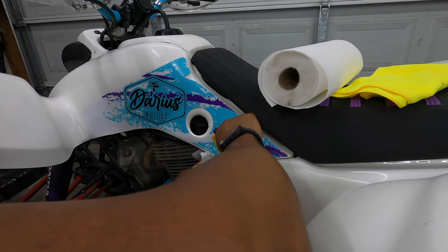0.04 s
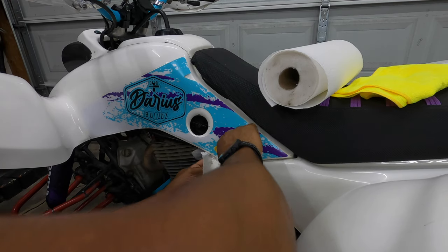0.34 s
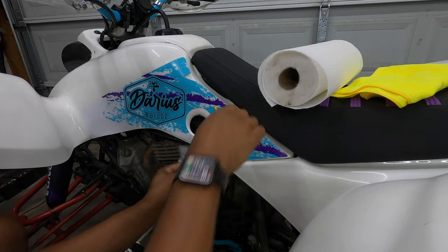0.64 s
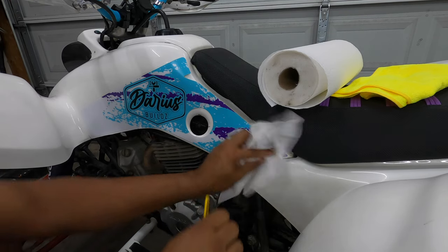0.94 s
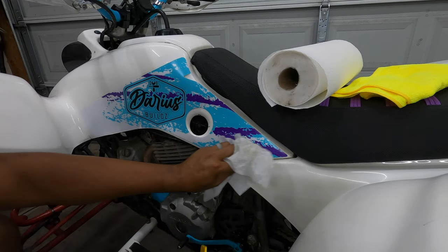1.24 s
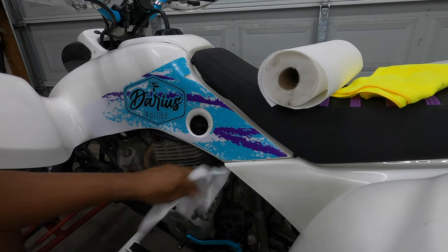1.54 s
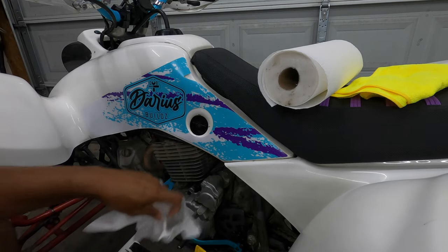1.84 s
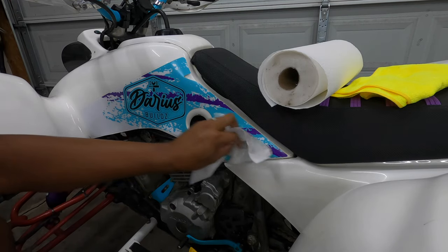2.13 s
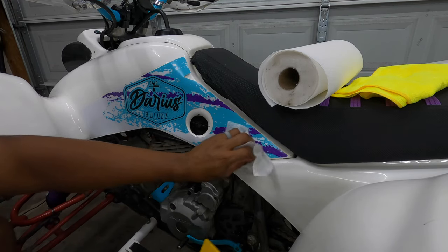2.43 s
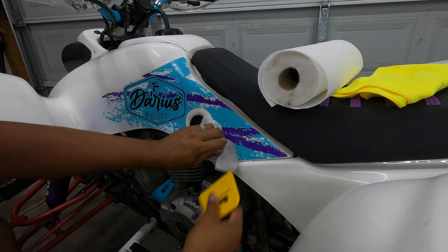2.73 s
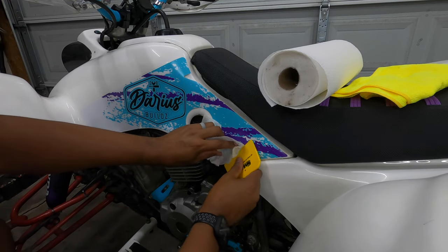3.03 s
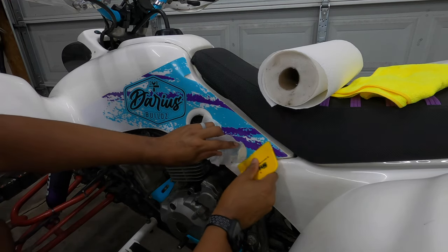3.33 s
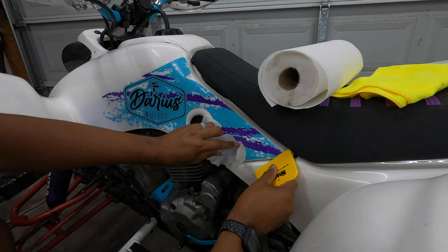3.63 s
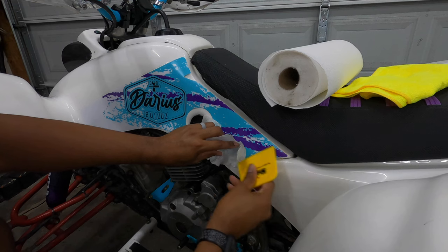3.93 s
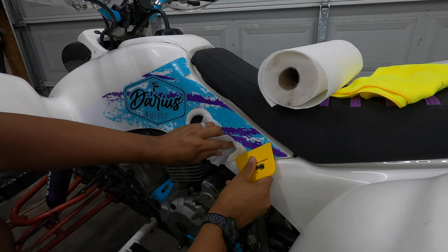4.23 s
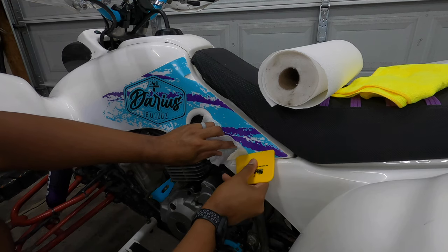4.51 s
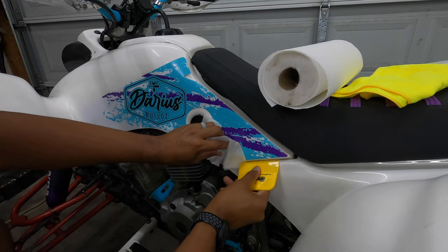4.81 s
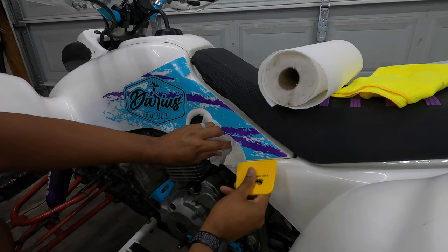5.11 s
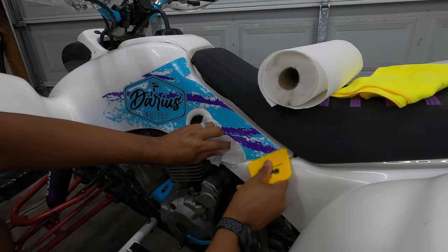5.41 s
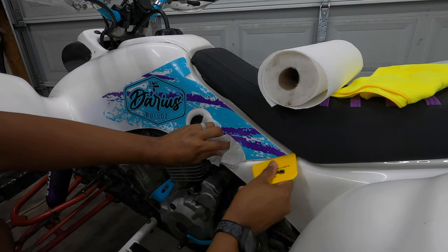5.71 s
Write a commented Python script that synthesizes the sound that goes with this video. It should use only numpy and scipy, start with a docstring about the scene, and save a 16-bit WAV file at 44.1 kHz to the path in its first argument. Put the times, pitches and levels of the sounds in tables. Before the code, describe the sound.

In a garage, fingers knock a hollow plastic panel, a paper towel wipes softly, and a plastic card scrapes and snaps over wet vinyl.

```python
"""Hollow plastic knocks, sharp snaps and soft, damp rubbing: hands work a wet vinyl decal onto a quad bike.
Fingers knock the side panel and ring its modes. A plastic squeegee card snaps over the edge,
and scrapes and sings hoarsely on the wet vinyl. A paper towel wipes with a faint crinkle.
The garage rings briefly and rumbles; one microphone hears it all and overloads on the hardest blows."""
import sys
import numpy as np
from scipy import signal
from scipy.fft import rfft, irfft
from scipy.io import wavfile
from scipy.ndimage import uniform_filter1d, minimum_filter1d

SR = 44100
rng = np.random.default_rng(int(sys.argv[2]) if len(sys.argv) > 2 else 0)


def output_pcm(signal):
    """Save a mono or channel-first signal as 16-bit PCM at the path in sys.argv[1].

    Samples are clipped to [-1, 1] before scaling.
    """
    pcm = np.clip(np.atleast_2d(signal).T, -1, 1) * 32767
    wavfile.write(sys.argv[1], SR, np.round(pcm).astype(np.int16))


N = 258293
TIME = np.arange(N) / SR
RING_TIME = TIME[:SR // 2]

# Finger blows on the panel. Each row: start in seconds, peak in dB, pitch the spot favours in Hz,
# contact cutoff in Hz (low is soft), rebound in dB against the blow.
FINGER_KNOCKS = [(0.4115, -4.5, 730, 1180, -6.5), (0.462, -3.5, 694, 930, -14), (0.474, -8, 167, 300, -12),
                 (0.537, -19.5, 664, 1210, -8), (0.583, 1, 335, 860, -15), (1.0891, 1, 487, 880, -10.5),
                 (1.128, -15.5, 286, 496, -4.5), (1.165, -20, 616, 1220, -13), (1.595, -14, 470, 610, -2),
                 (1.618, 6.5, 350, 920, -5), (2.362, -14, 470, 736, -22), (3.0775, -8, 422, 1300, -12),
                 (3.903, -10, 281, 470, -4), (4.232, -18.5, 182, 900, -16), (4.921, -12, 242, 493, 0.5),
                 (5.084, -15, 402, 450, -12), (5.112, -18, 295, 403, -2), (5.431, -13.5, 174.5, 1200, -7),
                 (5.7232, 7.5, 300, 2600, -2.5), (5.823, -6.5, 223, 450, -10)]
# The hollow panel's modes. Each row: pitch in Hz, level in dB, time to fade 60 dB in seconds.
PANEL_MODES = [(58, -69, 0.13), (137.5, -2, 0.12), (157, -15, 0.23), (205, 0.5, 0.19), (257.8, -8, 0.24),
               (318, 1.5, 0.14), (357.4, -6, 0.2), (393.8, 1, 0.11), (424.5, 1.5, 0.065), (512, -9.5, 0.15),
               (611, 1.5, 0.035), (701.4, 0, 0.037), (905, -5.5, 0.073), (1045, -11, 0.055),
               (1346, 10.5, 0.012), (1592, 1.5, 0.011), (1970, -36, .03)]
# The card's edge catching and letting go. Each row: start in seconds, ring peak in dB, ring pitch in Hz,
# crack level in dB, lead of the skid in seconds, room send in dB.
CARD_SNAPS = [(0.41, -15, 2520, -38, .001, -14), (0.459, -14, 2390, -17, 0.0041, -8),
              (0.536, -22, 2330, -22, .001, 6), (0.577, -19.5, 2870, -18.5, .002, -9),
              (0.914, -38, 4070, -27, 0.0028, -4), (1.0899, -24, 2240, -32, 0.0011, 7.5),
              (1.618, -19.5, 2930, -17.5, 0.01, -6), (3.0741, -11, 2365, -16, 0.00094, -7),
              (4.232, -11, 2274, -35, 0.00102, -5), (4.915, 4, 2545, 4, .0055, -1.5),
              (5.43, -20, 2610, -6, 0.00053, -2.5), (5.7206, 11.5, 2123, 12.5, .002, -6.5)]
# The card's modes. Each row: multiple of the ring pitch, level in dB, time to fade 60 dB in seconds.
CARD_MODES = [(.62, -12, .008), (1, 0, .011), (1.25, -9, .007), (1.95, -12, .01), (2.3, -15, .007)]
# Squeegee strokes. Each row: moment of hardest push in seconds, length in seconds, scrape level in dB,
# singing level in dB, singing pitch in Hz (higher when bent further).
SQUEEGEE_STROKES = [(0.76, 0.42, -44, -86, 2300), (3.037, 0.15, -35, -51, 2050),
                    (3.406, 0.16, -42.5, -45, 2170), (3.542, 0.33, -45, -46, 2330),
                    (3.957, 0.079, -37.5, -53, 2130), (4.259, 0.22, -39.5, -53, 2200),
                    (4.54, 0.12, -49, -59, 2340), (4.957, 0.16, -30.5, -35, 3220),
                    (5.096, 0.23, -35, -52.5, 3040), (5.377, 0.22, -39, -49, 2120),
                    (5.535, 0.2, -40, -48, 2220)]
# Resonances of the card bowed by wet vinyl. Each row: multiple of its pitch, width in Hz, level in dB,
# change in dB when fully bent.
SINGING_BANDS = [(1, 434, -5.5, 13), (1.998, 585, 0, -24), (2.8, 800, -8, -30)]
# Towel wipes. Each row: moment of hardest push in seconds, length in seconds, level in dB.
TOWEL_WIPES = [(0.494, 0.92, -52), (1.097, 0.3, -45.5), (1.296, 0.33, -45), (1.48, 0.11, -53),
               (1.596, 0.44, -45), (1.921, 0.11, -46), (2.16, 0.1, -45.5), (2.354, 0.39, -46.5),
               (2.652, 0.45, -49.5)]
# Tone curves for the card's crack and scrape, the paper, the walls' echo and the room's air.
# Each row: frequency in Hz, relative level in dB.
CRACK_TONE = [(300, 7), (900, -3), (1600, 2.5), (3000, 3), (4100, -8.5), (5200, -1), (7000, -4.5),
              (10000, -9.5), (16000, -19)]
SCRAPE_TONE = [(400, -5), (1300, -5.5), (2200, 4), (3400, -2), (4800, -8), (7000, -12.5), (10000, -17),
               (16000, -29)]
PAPER_TONE = [(300, -41), (1000, 3), (2200, 5.5), (4000, 1), (7000, -0.5), (11000, -4.5), (16000, -9)]
WALL_TONE = [(50, 19), (150, -5), (300, -2), (700, 3.5), (1400, 0.5), (2800, -4.5), (5000, -5), (9000, -6),
             (16000, 1)]
AIR_TONE = [(59, -37), (100, -4), (129, -7.5), (255, -27.5), (335, -17.5), (524, -20.5), (621, -18.5),
            (1150, -28.5), (1610, -33), (2370, -32), (2860, -38), (3190, -36.5), (5650, -38.5),
            (15000, -40.5), (16000, -44)]
# The garage's decay. Each row: frequency in Hz, time to fade 60 dB in seconds.
GARAGE_DECAY = [(125, 0.46), (350, 0.57), (1000, 0.49), (2800, 0.43), (7000, 0.47), (15000, 0.33)]
# The garage's low rumble. Each row: centre in Hz, width in Hz, relative level in dB.
RUMBLE_BANDS = [(26.6, 23.4, 7.5), (55, 11.7, -11), (100, 110, -11)]
# The swell of a low drone. Each row: time in seconds, relative level in dB.
DRONE_SWELL = [(0, -40), (1.5, -31.5), (3.8, -26.5), (5.86, -29.5)]


def panel_knocks(graze_lead_s=0.007, rebound_lag_s=0.011, room_db=-4):
    """Every knock is a bright fingertip graze, the blow, and the panel springing back lower and duller."""
    out = np.zeros((2, N))
    # the resting hand shifts the modes a little from blow to blow
    grips = 1 + .02 * rng.standard_normal((len(FINGER_KNOCKS), len(PANEL_MODES)))
    for (s, db, spot_hz, contact_hz, rebound_db), detune in zip(FINGER_KNOCKS, grips):
        graze = panel_blow(spot_hz, contact_hz * 4.6, detune)
        rebound = panel_blow(spot_hz * 0.677, contact_hz * 0.44, detune)
        blow = panel_blow(spot_hz, contact_hz, detune)
        add(out, s - graze_lead_s, peak(graze, db - 19), room_db)
        add(out, s, peak(blow, db), room_db)
        add(out, s + rebound_lag_s, peak(rebound, db + rebound_db), room_db)
    return out


def panel_blow(spot_hz, contact_hz, detune, spot_db=7, spot_octaves=0.69, dent_cycles=16.8,
               press_s=0.00098, clack_s=0.028):
    """A blow dents the panel and rings its modes, most of all those that move at the struck spot."""
    ring = 0
    for (hz, db, t60), shift in zip(PANEL_MODES, detune):
        nearness = np.exp(-(np.log2(hz / spot_hz) / spot_octaves) ** 2)
        ring = ring + mode(hz * shift, db + spot_db * nearness, t60)
    # the crowded upper modes blur into a short clack
    clack = undb(5) * rng.standard_normal(len(RING_TIME)) * np.exp(-RING_TIME / clack_s)
    dent = mode(spot_hz, db=10, t60=dent_cycles / spot_hz)
    attack = 1 - np.exp(-RING_TIME / press_s)
    # a soft fingertip pushes for longer and leaves the high modes still
    return lowpass((ring + clack + dent) * attack, contact_hz)


def card_snaps(skid_db=-7.5, bounce_s=0.0047):
    """The card's edge skids, snaps free and lands once more."""
    out = np.zeros((2, N))
    for s, ring_db, ring_hz, crack_db, skid_s, room_db in CARD_SNAPS:
        add(out, s - skid_s, card_click(ring_db + skid_db, ring_hz, crack_db + skid_db), room_db)
        add(out, s, card_click(ring_db, ring_hz, crack_db), room_db)
        add(out, s + bounce_s, card_click(ring_db - 23, ring_hz, crack_db - 14), room_db)
    return out


def card_click(ring_db, ring_hz, crack_db, attack_s=0.0015, crack_s=0.0042, db_per_octave=14):
    """The card lets go with a crack and rings at a pitch set by the grip."""
    ring = sum(mode(ring_hz * ratio, db, t60) for ratio, db, t60 in CARD_MODES)
    ring *= 1 - np.exp(-RING_TIME / attack_s)
    crack = unit(colour(rng.standard_normal(len(RING_TIME)), CRACK_TONE)) * np.exp(-RING_TIME / crack_s)
    # a harder snap is quicker and so brighter, up to the limit of the soft plastic
    edge_hz = min(14000 * 2 ** (crack_db / db_per_octave), 10200)
    return peak(lowpass(ring, edge_hz), ring_db) + undb(crack_db) * lowpass(crack, edge_hz) / 2


def squeegee(uneven_db=1.85, flat_hz=2100, bent_hz=2380):
    """The card's edge scrapes unevenly over wet vinyl and sets the card singing hoarsely."""
    scrape_gain = sum(undb(db) * pressure(s, length) for s, length, db, _, _ in SQUEEGEE_STROKES)
    song_gain = sum(undb(db) * pressure(s, length) for s, length, _, db, _ in SQUEEGEE_STROKES)
    friction = slips() * undb(uneven_db * wander(rate_hz=110))
    times, *_, pitches = np.transpose(SQUEEGEE_STROKES)
    pitch = np.interp(TIME, times, pitches)
    bend = np.interp(pitch, [flat_hz, bent_hz], [0, 1])
    phase = 2 * np.pi * np.cumsum(pitch) / SR
    song = 0
    for multiple, width_hz, db, bent_db in SINGING_BANDS:
        # each resonance picks a narrow band from the slips; bending chokes the upper ones
        carrier = np.exp(1j * multiple * phase)
        band = (lowpass(friction / carrier, width_hz / 2) * carrier).real
        song = song + undb(db + bend * bent_db) * band
    return scrape_gain * unit(colour(friction, SCRAPE_TONE)) + song_gain * unit(song)


def paper_towel(crinkle_db=-4, crinkle_hz=2300, crinkle_width_hz=2600):
    """Damp paper fibres drag under the hand, and small folds buckle now and then."""
    push = sum(undb(db) * pressure(s, length) for s, length, db in TOWEL_WIPES)
    drag = unit(colour(slips(), PAPER_TONE)) * undb(1.6 * wander(rate_hz=60))
    folds = rng.standard_normal(N) * undb(5.5 * wander(rate_hz=180))
    crinkle = unit(resonate(folds, [(crinkle_hz, crinkle_width_hz, 0)]))
    return push * (drag + undb(crinkle_db) * crinkle)


def pressure(hardest_s, length_s, rise_share=0.44):
    """A hand presses in and eases off."""
    ramp = np.interp((TIME - hardest_s) / length_s, [-rise_share, 0, 1 - rise_share], [0, 1, 0])
    return np.sin(np.pi / 2 * ramp)


def slips(per_second=8000, spread_db=3):
    """Friction: dense tiny slips of unequal size."""
    grains = (rng.random(N) < per_second / SR) * rng.standard_normal(N)
    return unit(grains * undb(spread_db * rng.standard_normal(N)))


def garage_reverb(send, wet_db=-7, predelay_s=0.0014, build_s=0.0032):
    """Close walls return a dense tail whose treble dies first."""
    hz, _, spectrogram = signal.stft(colour(rng.standard_normal(SR), WALL_TONE), SR, nperseg=256)
    age_s = np.linspace(0, 1, spectrogram.shape[1])
    fade = undb(-60 * age_s / curve_at(GARAGE_DECAY, hz)[:, None])
    build = 1 - np.exp(-np.maximum(TIME[:SR] - predelay_s, 0) / build_s)
    tail = signal.istft(spectrogram * fade, SR)[1][:SR] * build
    return undb(wet_db) * signal.fftconvolve(send, unit(tail) / np.sqrt(SR))[:N]


def room_tone(rumble_db=-27.5, drone_hz=68.7, drone_width_hz=21.4, air_db=-36.5):
    """A bed of low rumble, a wavering drone and an even hiss."""
    rumble = unit(resonate(rng.standard_normal(N), RUMBLE_BANDS))
    drone = unit(resonate(rng.standard_normal(N), [(drone_hz, drone_width_hz, 0)]))
    drone_db = np.interp(TIME, *np.transpose(DRONE_SWELL)) + 0.5
    air = unit(colour(rng.standard_normal(N), AIR_TONE))
    return undb(rumble_db) * rumble + undb(drone_db) * drone + undb(air_db) * air


def mode(hz, db, t60):
    """One vibration, fading 60 dB in t60 seconds."""
    return undb(db - 60 * RING_TIME / t60) * np.sin(2 * np.pi * hz * RING_TIME)


def wander(rate_hz):
    """Smooth random drift with a spread near 1."""
    hold = int(SR / rate_hz)
    steps = np.repeat(rng.standard_normal(N // hold + 1), hold)
    return unit(uniform_filter1d(uniform_filter1d(steps, hold), hold)[:N])


def resonate(x, bands):
    """Pass a sound through steep resonances, each a centre in Hz, a width in Hz and a level in dB."""
    f = np.fft.rfftfreq(len(x), 1 / SR) + 1e-3
    gain = sum(undb(db) / (1 + ((f * f - hz * hz) / (f * width)) ** 2) for hz, width, db in bands)
    return irfft(rfft(x) * gain, len(x))


def colour(x, tone):
    """Equalise a sound with a tone curve."""
    hz = np.fft.rfftfreq(len(x), 1 / SR)
    return irfft(rfft(x) * undb(curve_at(tone, hz)), len(x))


def curve_at(points, hz):
    """Read a curve on a log-frequency axis."""
    point_hz, values = np.transpose(points)
    return np.interp(np.log(hz + 1e-3), np.log(point_hz), values)


def lowpass(x, hz):
    """Roll off the top at 12 dB an octave."""
    return signal.sosfilt(signal.butter(2, hz, fs=SR, output="sos"), x)


def undb(db):
    """Decibels to gain."""
    return 10 ** (np.asarray(db) / 20)


def unit(x):
    """Scale to rms 1."""
    return x / np.sqrt(np.mean(x ** 2))


def peak(x, db):
    """Scale to a peak level."""
    return x * undb(db) / np.abs(x).max()


def add(track, start_s, sound, room_db):
    """Mix a sound in: row 0 goes straight to the microphone, row 1 is the room send."""
    i = int(start_s * SR)
    track[:, i:i + len(sound)] += np.outer([1, undb(room_db)], sound[:N - i])


def limiter(x, ceiling_db=8, release_s=0.24):
    """Duck a few milliseconds ahead of a peak and recover slowly."""
    overshoot = np.maximum(np.log(np.abs(x).max(axis=0) + 1e-9) - np.log(undb(ceiling_db)), 0)
    recovery = np.exp(-TIME / release_s)
    reduction = np.maximum.accumulate(overshoot / recovery) * recovery
    span = 2 * int(.006 * SR) + 1  # 6 ms each way
    return x * uniform_filter1d(minimum_filter1d(np.exp(-reduction), span), span)


def scene():
    """All the handwork sounds in the garage; both channels carry the same signal."""
    direct, send = panel_knocks() + card_snaps() + squeegee() + paper_towel()
    mono = direct + garage_reverb(send) + room_tone()
    return np.array([mono, mono])


def record(dry):
    """The recorder ducks under the loudest blows, flattens their peaks and cuts the top."""
    ducked = limiter(dry)
    soft_clipped = .92 * ducked / (1 + ducked ** 6) ** (1 / 6)
    top_hz = 16200
    return signal.sosfilt(signal.ellip(12, .1, 90, top_hz, fs=SR, output="sos"), soft_clipped)


dry = scene()
out = record(dry)
output_pcm(out)
```